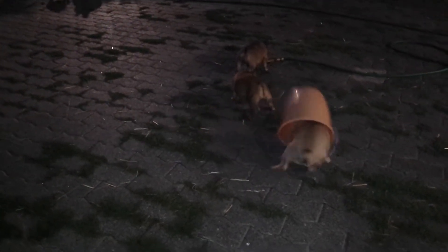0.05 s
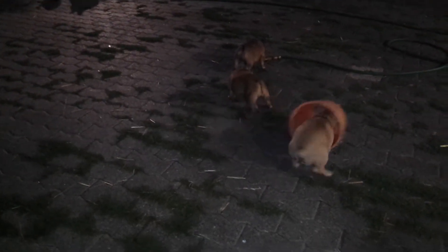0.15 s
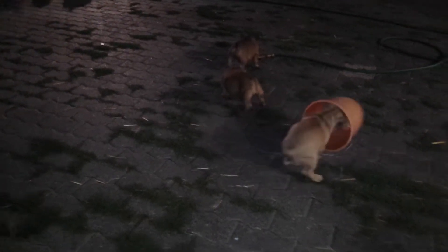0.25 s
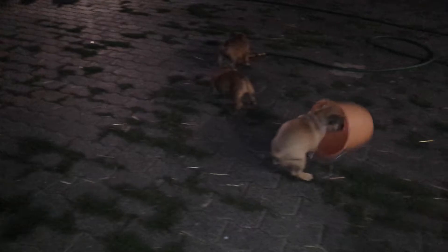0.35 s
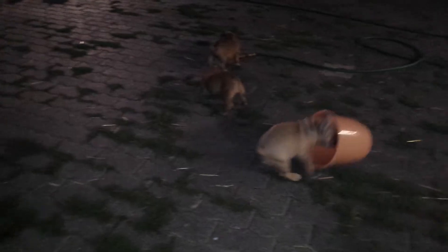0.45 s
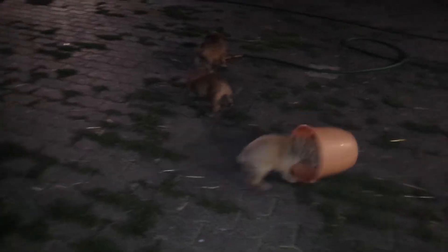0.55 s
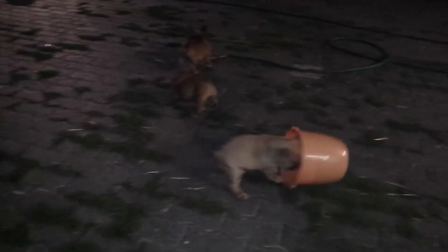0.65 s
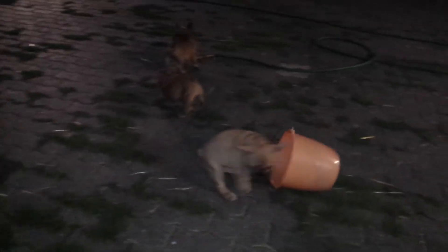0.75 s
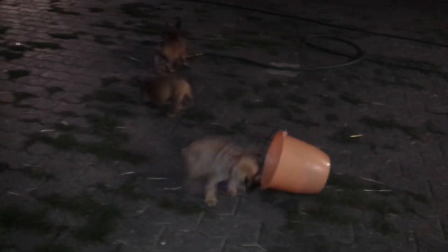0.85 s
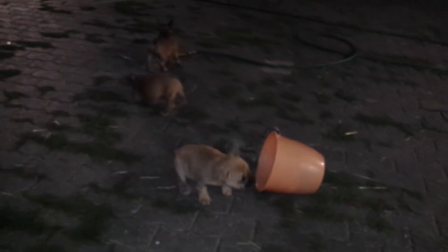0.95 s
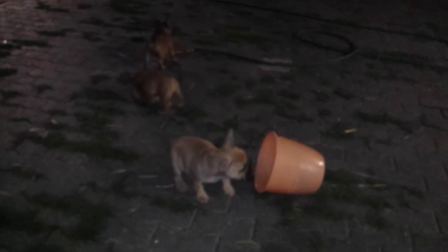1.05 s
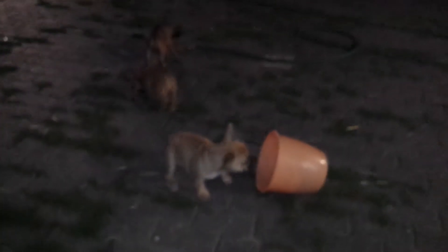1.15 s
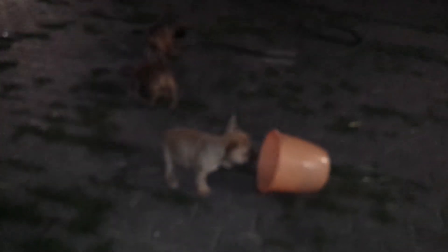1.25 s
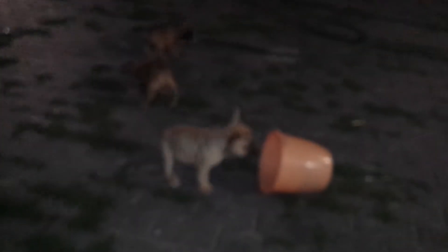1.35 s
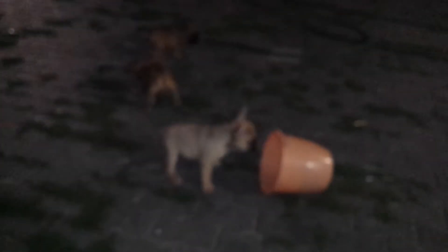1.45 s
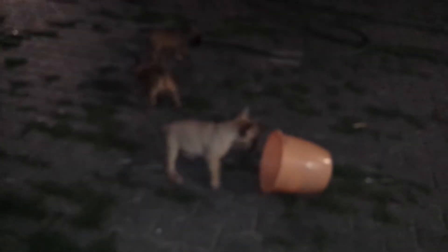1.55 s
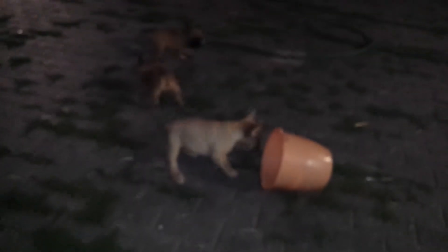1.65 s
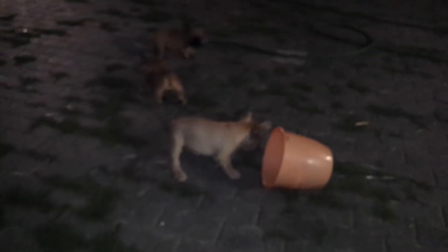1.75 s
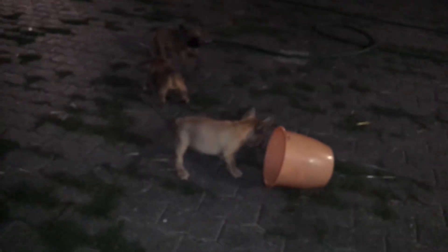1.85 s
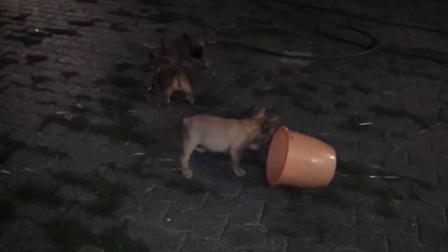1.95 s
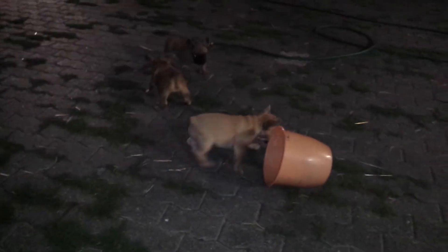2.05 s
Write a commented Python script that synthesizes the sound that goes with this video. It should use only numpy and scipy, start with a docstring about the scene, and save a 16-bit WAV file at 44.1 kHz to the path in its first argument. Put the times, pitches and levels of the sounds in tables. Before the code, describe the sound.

An empty plastic flower pot bumps and booms hollowly on paving stones, clatters and scrapes to rest within the first second, then a faint late knock and soft paw scuffs; house walls echo, low motor hum, duller left side.

```python
"""On a quiet patio at night a puppy shoves an empty plastic flower pot over paving stones.
The pot booms (decaying sines), clacks (struck wall resonators) and clicks at the rim (filtered chatter);
its rim scrapes (random slips), rolls to rest (a gliding resonance) and knocks once more; paws scuff (noise).
House walls echo it all through noise shaped as reverberation; a motor hums as sines over night air.
The left microphone is duller than the right."""
import sys
import numpy as np
from scipy import signal
from scipy.fft import rfft, irfft
from scipy.io import wavfile

SR = 44100
rng = np.random.default_rng(int(sys.argv[2]) if len(sys.argv) > 2 else 0)


def dump(signal):
    """Clip the signal to [-1, 1] and save it as 16-bit WAV at the path in sys.argv[1]."""
    limited = np.clip(np.atleast_2d(signal).T, -1, 1)
    pcm = np.round(limited * 32767).astype(np.int16)
    wavfile.write(sys.argv[1], SR, pcm)


N = 92610


def amp(db):
    """Decibels to gain."""
    return 10 ** (np.asarray(db) / 20)


def unit(x):
    """Scales to rms 1."""
    return x / np.sqrt(np.mean(x ** 2) + 1e-20)


def blow(x, size=256):
    """Scales a hit to the energy of about 6 ms at level 1."""
    energy = np.sum(x ** 2, -1, keepdims=True)
    return x * np.sqrt(size / (energy + 1e-20))


def read(points, hz):
    """Reads a table on a log-frequency axis."""
    point_hz, value = np.transpose(points)
    return np.interp(np.log(hz + 1), np.log(point_hz), value)


def add(mix, start_s, sound):
    """Mixes a sound in at a time, trimming what falls outside."""
    at = round(start_s * SR)
    sound = sound[..., max(-at, 0):]
    part = mix[..., max(at, 0):][..., :sound.shape[-1]]
    part += sound[..., :part.shape[-1]]


def colour(x, points, size=2048):
    """Minimum-phase filter with the given spectrum: no sound precedes its cause."""
    log_gain = np.log(amp(read(points, abs(np.fft.fftfreq(size, 1 / SR)))))
    min_phase = np.exp(np.conj(signal.hilbert(log_gain)))
    taps = np.fft.ifft(min_phase).real[:size // 2]
    if x.ndim > 1:
        taps = taps[None]
    return signal.fftconvolve(x, taps, axes=-1)[..., :x.shape[-1]]


def blend(a, b, same):
    """Left spectrum sharing the fraction `same` with the right one, b, at equal power."""
    return same * b + np.sqrt(1 - same ** 2) * a


# Each row: frequency in Hz, left-right likeness 0..1.
PORT_SAME = [(500, 1), (1200, 1), (2500, 1), (7000, 0.2)]


def pair(z):
    """Two unrelated signals become alike in the bass and differ in the treble, as at two microphone ports."""
    size = z.shape[1]
    same = np.clip(read(PORT_SAME, np.fft.rfftfreq(size, 1 / SR)), 0, 1)
    a, b = rfft(z)
    return irfft(np.array([blend(a, b, same), b]), size)


GRAIN_DB, GRAIN_SAMPLES = 13, 16
FIRST_TOUCH_DB, FIRST_TOUCH_S, CLICK_FALL_S = 3, 0.00047, 0.003


def contact(t, length_s):
    """A first hard touch and a few milliseconds of chatter as the edge meets rough stone."""
    grains = np.repeat(rng.standard_normal(len(t)), GRAIN_SAMPLES)[:len(t)].clip(-2, 2) / 2
    level_db = GRAIN_DB * grains + FIRST_TOUCH_DB * np.exp(-t / FIRST_TOUCH_S)
    chatter = pair(rng.standard_normal((2, len(t)))) * amp(level_db)
    # the fall steepens after length_s
    return chatter * np.exp(-t / length_s / 2 - np.maximum(t - length_s, 0) / CLICK_FALL_S)


# Modes of the pot's thin wall. Each row: frequency in Hz, relative level in dB, T60 in seconds.
WALL_MODES = [(444, -1.5, 0.024), (628, 0.5, 0.05), (730, 8.5, 0.02), (830, -5, .04), (1013, 7, 0.048),
              (1114, 8.5, 0.036), (1172, 4.5, 0.027), (1490, 3.5, 0.026), (1567, 7.5, 0.0093),
              (1764, -4.5, 0.039), (2150, 0, 0.045), (2330, 5.5, 0.03), (2414, -14, 0.045),
              (3100, 1.5, 0.008)]
WALL_DETUNE = 0.02  # largest random shift, as a fraction
FOCUS_DB, FOCUS_OCTAVES = 10, 0.1
TILT_PIVOT_HZ = 830


def wall(force, tilt_db_per_octave, note_hz):
    """The thin plastic wall rings in its short modes; the place of contact favours some of them."""
    out = 0
    bends = 2 * rng.random(len(WALL_MODES)) - 1
    for (hz, db, t60_s), bend in zip(WALL_MODES, bends):
        r = np.exp(-np.log(1000) / (t60_s * SR))
        angle = 2 * np.pi * hz * (1 + WALL_DETUNE * bend) / SR
        ring = signal.lfilter([1, 0, -1], [1, -2 * r * np.cos(angle), r * r], force)
        focus_db = FOCUS_DB * np.exp(-(np.log2(hz / note_hz) / FOCUS_OCTAVES) ** 2 / 2)
        tilt_db = tilt_db_per_octave * np.log2(hz / TILT_PIVOT_HZ)
        out = out + amp(db + focus_db + tilt_db) * blow(ring)
    return out


# Modes of the air space and base. Each row: frequency in Hz, level in dB, T60 in seconds.
HOLLOW_MODES = [(125, -55, 0.031), (204.7, 2, 0.11), (348.8, -10.5, 0.12), (378.2, -2, 0.078)]
BOOM_RISE_S = 0.0049


def hollow(t):
    """The pot's air space and base boom as decaying sines with a soft onset."""
    boom = sum(amp(db - 60 * t / t60_s) * np.sin(2 * np.pi * hz * t) for hz, db, t60_s in HOLLOW_MODES)
    return boom * (1 - np.exp(-t / BOOM_RISE_S))


# Flat landings. Each row: start in seconds, level in dB, frequency in Hz, decay constant in seconds.
THUDS = [(0.2423, -14, 196.3, 0.011), (0.4941, -23, 260, 0.012), (0.5791, -4.5, 174, 0.0036),
         (0.6583, -15.5, 315, 0.0063), (1.4906, -22.5, 207, 0.0019)]


def thuds():
    """The pot landing flat: a dull thump, the slope of a short damped flexing."""
    out, t = np.zeros(N), np.arange(SR // 2) / SR
    for start_s, db, hz, decay_s in THUDS:
        onset = (1 - np.exp(-2 * t / decay_s)) ** 2
        flex = -np.cos(2 * np.pi * hz * t) * np.exp(-t / decay_s) * onset
        add(out, start_s, amp(db) * np.gradient(flex) * SR / (np.pi * hz))
    return out


# Pot hitting stone. Each row: start in seconds, hollow boom in dB, wall clack in dB, rim click in dB,
# wall brightness in dB per octave, favoured wall note in Hz, contact length in seconds.
KNOCKS = [(0.09, -45.5, -48, -40.5, -2, 2300, 0.0023), (0.125, -44, -22.5, -31, -3, 2040, 0.0027),
          (0.1332, -38.5, -37, -33.5, -9, 810, 0.0018), (0.143, -27.5, -30, -43, 1, 1000, 0.0083),
          (.167, -31.5, -26.5, -60, 4, 1030, 0.0042), (0.181, -36, -39, -37.5, -3, 1000, 0.0027),
          (0.2366, -3, -21.5, -30.5, 10, 1190, 0.0068), (0.302, -16, -35.5, -47.5, -13, 1170, 0.0066),
          (.349, -31.5, -47, -82, 10, 1130, 0.0026), (0.358, -62, -34, -36.5, 10, 1780, 0.0042),
          (0.398, -33, -37, -64, -5, 1090, 0.0043), (0.4885, -5.5, -15, -23.5, -7.5, 1350, 0.005),
          (0.561, -44, -35, -60, -8, 1480, .002), (0.5762, -16.5, -23, -21.5, 15, 760, 0.004),
          (0.603, -66, -22.5, -22, -6, 1480, 0.0076), (0.609, -61, -19.5, -47, 5.5, 1010, 0.003),
          (.633, -27, -54, -45, 32, 1500, 0.0036), (.659, -29.5, -29.5, -61, -30, 716, 0.0032),
          (0.733, -48, -39, -49, -7, 756, 0.0074), (0.7482, -30, -28.5, -43, 6, 750, 0.0088),
          (0.762, -50, -20.5, -35, -8.5, 1140, 0.0051), (.773, -40, -39, -69, -24, 1140, .006),
          (0.793, -37, -31.5, -49, 8, 849, 0.0045), (0.809, -62, -32, -60, 6, 1050, .004),
          (.818, -56, -25.5, -43, -13, 915, 0.0036), (.829, -32, -28, -36, 9, 1150, 0.0032),
          (1.487, -50.5, -36.5, -36.5, -0.5, 500, 0.0017), (1.4913, -43, -28.5, -44, -9, 694, 0.0033)]
# Hard rim on stone. Each row: frequency in Hz, relative level in dB.
RIM_SPECTRUM = [(300, -17), (1500, -7), (2800, -26), (3400, 12), (4100, 5.5), (5000, 8.5), (5700, 6),
                (6750, 17), (7900, 4.5), (10500, -10.5), (16000, -36)]


def knocks():
    """Each knock clicks at the rim, clacks in the wall and booms in the hollow."""
    out, t = np.zeros((2, N)), np.arange(SR // 2) / SR
    for start_s, boom_db, clack_db, click_db, tilt_db, note_hz, length_s in KNOCKS:
        boom = amp(boom_db) * hollow(t)
        force = contact(t, length_s)
        clack = amp(clack_db) * blow(wall(force, tilt_db, note_hz))
        click = amp(click_db) * blow(colour(force, RIM_SPECTRUM))
        add(out, start_s, boom + clack + click)
    return out + thuds()


# Rim scrapes; the first row, dense slips, stands for the ringing-out of an earlier knock.
# Each row: start in seconds, length in seconds, level in dB.
SCRAPES = [(-.05, 0.097, -57.5), (0.142, 0.067, -60), (0.298, .17, -68), (0.611, 0.095, -63.5),
           (0.763, 0.098, -53.5), (0.863, 0.15, -66)]
SLIPS_PER_S, GRIT_DB = 900, -13
SCRAPE_TILT_DB_PER_OCTAVE, SCRAPE_NOTE_HZ = -2, 1730


def scrapes():
    """Dense random slips shake the wall: rim scrapes, and first the ringing-out of an earlier knock."""
    out, t = np.zeros((2, N)), np.arange(SR // 2) / SR
    for start_s, length_s, db in SCRAPES:
        slips = (rng.random(len(t)) < SLIPS_PER_S / SR) * pair(rng.standard_normal((2, len(t))))
        force = slips * np.sin(np.pi * np.minimum(t / length_s, 1))
        ring = unit(wall(force, SCRAPE_TILT_DB_PER_OCTAVE, SCRAPE_NOTE_HZ))
        grit = amp(GRIT_DB) * unit(colour(force, RIM_SPECTRUM))
        # unit() averages over all of t; restore the level over length_s
        add(out, start_s, amp(db) * (ring + grit) * np.sqrt(t[-1] / length_s))
    return out


# Rim rolling to rest. Each row: start in seconds, length in seconds, level in dB, first note in Hz, last note in Hz.
ROLLS = [(0.766, 0.032, -36, 1138, 1142), (0.789, .056, -31, 704.7, 1224)]
ROLL_WIDTH_HZ = 230


def rolls():
    """Rough stone drives one wall resonance as the rim rolls; its note slides as the contact travels."""
    out = np.zeros((2, N))
    r = np.exp(-np.pi * ROLL_WIDTH_HZ / SR)
    for start_s, length_s, db, from_hz, to_hz in ROLLS:
        u = np.arange(0, 1, 1 / (length_s * SR))
        a, b = rng.standard_normal((2, SR // 4))
        jolts = a + 1j * b
        for _ in range(2):
            jolts = signal.lfilter([1 - r], [1, -r], jolts)
        turns = np.cumsum(from_hz * (to_hz / from_hz) ** u) / SR
        note = (jolts[-len(u):] * np.exp(2j * np.pi * turns)).real
        add(out, start_s, amp(db) * unit(note * np.sin(np.pi * u)))
    return out


# Grit snapping under claws. Each row: start in seconds, level in dB.
TICKS = [(0.433, -40), (1.2375, -40)]
# Colour of a snap. Each row: frequency in Hz, relative level in dB.
TICK_SPECTRUM = [(1000, -7), (4000, -6), (7000, 11), (13000, -1), (16000, -3)]
# Pads on paving. Each row: start in seconds, length in seconds, level in dB, centre in Hz, width in octaves.
SCUFFS = [(0.424, .03, -44, 12400, 0.13), (1.133, .08, -53, 8550, 0.36), (1.822, 0.044, -46, 3840, 0.88),
          (1.849, 0.025, -41.5, 4500, 0.71), (1.942, 0.05, -43.5, 7900, 0.81)]
SAND_DB = 7


def paws():
    """Claws snap on grit (short chatter) and pads brush the paving (grainy noise in a band)."""
    out, t = np.zeros((2, N)), np.arange(SR // 4) / SR
    for start_s, db in TICKS:
        add(out, start_s, amp(db) * blow(colour(contact(t, length_s=0.0021), TICK_SPECTRUM)))
    octaves = np.log2(np.fft.rfftfreq(len(t), 1 / SR) + 1)
    for start_s, length_s, db, hz, width_octaves in SCUFFS:
        band = np.exp(-((octaves - np.log2(hz)) / width_octaves) ** 2 / 2)
        grains_db = SAND_DB * rng.exponential(1, len(t)).clip(0, 4)
        sand = rng.standard_normal((2, len(t))) * amp(grains_db)
        brush = unit(irfft(rfft(sand) * band, len(t)))
        add(out, start_s, amp(db) * brush * np.sin(np.pi * np.minimum(t / length_s, 1)))
    return out


# Decay of the yard. Each row: frequency in Hz, T60 in seconds.
YARD_T60 = [(200, 0.62), (600, 0.3), (1500, 0.44), (4000, 0.4), (8000, 0.59), (15000, 0.52)]
# Strength of the yard's return. Each row: frequency in Hz, level in dB.
YARD_SPECTRUM = [(100, -14.5), (220, -11), (400, -5), (900, -5.5), (2000, -1.5), (4000, -5.5), (7000, -6.5),
                 (14000, -5.5)]
ECHO_DELAY_S, ECHO_RISE_S, ECHO_FALL_S, ECHO_BOOST_DB = 0.018, 0.012, 0.0083, 16
NEAR_SCATTER_DB, YARD_SAME_HZ = -3, 700


def yard(x, size=128):
    """Near scatter builds first; then house walls return a cluster of echoes and an open-air tail."""
    hz, t, z = signal.stft(rng.standard_normal((2, SR)), SR, nperseg=size)
    late_s = np.maximum(t - ECHO_DELAY_S, 0)
    echoes = np.minimum(late_s / ECHO_RISE_S, 1) * amp(ECHO_BOOST_DB * np.exp(-late_s / ECHO_FALL_S))
    scatter = amp(NEAR_SCATTER_DB) * np.minimum(t / ECHO_RISE_S, 1)
    decay = amp(-60 * t / read(YARD_T60, hz)[:, None]) * np.maximum(echoes, scatter)
    decay /= np.sqrt((decay ** 2).sum(1, keepdims=True) * size / 2)  # equal energy per band
    tail = colour(signal.istft(z * decay, SR, nperseg=size)[1], YARD_SPECTRUM)
    a, b = rfft(tail)
    same = np.exp(-(np.fft.rfftfreq(tail.shape[1], 1 / SR) / YARD_SAME_HZ) ** 2)
    response = irfft(np.array([blend(a, b, same), b]))
    return signal.fftconvolve(x, response, axes=1)[:, :N]


HOLD_DELAY_S, HOLD_DB, HOLD_CUTOFF_HZ = 0.0238, -19.5, 600


def boom_hold(x):
    """One low-passed delayed copy, about five boom cycles late, makes the boom hold longer."""
    hz = np.fft.rfftfreq(2 * N, 1 / SR)
    path = amp(HOLD_DB) * np.exp(-2j * np.pi * hz * HOLD_DELAY_S) / (1 + 1j * hz / HOLD_CUTOFF_HZ)
    return irfft(rfft(x, 2 * N) * path)[:, :N]


TURN_S = 0.12


def surroundings(x, count=3):
    """Three random yard tails crossfade in turn, so the reverberation keeps varying; the boom is held."""
    turn = np.arange(N) / SR / TURN_S
    out = 0
    for k in range(count):
        away = abs((turn - k + count / 2) % count - count / 2)
        out = out + yard(x * np.cos(np.pi / 2 * np.minimum(away, 1)))
    return out + boom_hold(x)


# Motor hum. Each row: frequency in Hz, rms level in dB.
HUM = [(113.2, -60.5), (169.6, -49.5), (339.2, -68)]
HUM_WAVER = 0.033  # rms, as a fraction of the level


def motor():
    """A nearby motor hums: steady sines whose common level wavers slightly."""
    t, hz = np.arange(N) / SR, np.fft.rfftfreq(N, 1 / SR)
    waver = unit(irfft(rfft(rng.standard_normal(N)) * np.exp(-hz / 6), N))
    hum = sum(amp(db) * np.sqrt(2) * np.sin(2 * np.pi * (f * t + rng.random())) for f, db in HUM)
    return hum * (1 + HUM_WAVER * waver)


# Night air and microphone hiss. Each row: frequency in Hz, relative density in dB.
AIR_SPECTRUM = [(20, -36), (45, -3.5), (110, 4.5), (190, 3.5), (260, -7), (420, -8.5), (1260, -16.5),
                (3600, -18.5), (5000, -12.5), (6500, -4), (8000, -14), (10000, -18), (15400, -22),
                (16000, -38)]
# Each row: frequency in Hz, left-right likeness.
AIR_SAME = [(60, 1), (150, 0.27), (300, 0.67), (640, 0.44), (1400, 0.037)]
# Left air against right. Each row: frequency in Hz, gain in dB.
LEFT_AIR = [(60, -.5), (700, -2), (2400, -3.5), (4400, -6.5), (6600, -20.5), (9000, -8.5), (15000, -1.5)]
AIR_DB = -52


def night_air():
    """Night air and microphone hiss: shaped noise, alike in the bass, duller on the left."""
    hz = np.fft.rfftfreq(N, 1 / SR)
    a, b = rfft(rng.standard_normal((2, N)))
    same = np.clip(read(AIR_SAME, hz), -1, 1)
    left = blend(a, b, same) * amp(read(LEFT_AIR, hz))
    return amp(AIR_DB) * unit(irfft(np.array([left, b]) * amp(read(AIR_SPECTRUM, hz)), N))


# Left microphone against right. Each row: frequency in Hz, gain in dB.
LEFT_MIC = [(60, -.7), (250, -1.5), (450, -1.5), (740, -2), (1220, -4.5), (2010, -7), (3330, -12),
            (5500, -21), (7000, -23), (9000, -17.5), (15000, -11)]


def scene():
    """Pot and paws in the yard, duller on the left, over motor and air."""
    near = knocks() + scrapes() + rolls() + paws()
    left, right = near + surroundings(near)
    return np.array([colour(left, LEFT_MIC), right]) + night_air() + motor()


EDGE_HZ = 15800


def record(dry):
    """A steep low-pass: almost nothing sounds above about 15.8 kHz."""
    taps = signal.firwin(511, EDGE_HZ, window=("kaiser", 9), fs=SR)
    return signal.oaconvolve(dry, taps[None], "same")


dry = scene()
out = record(dry)
dump(out)
```